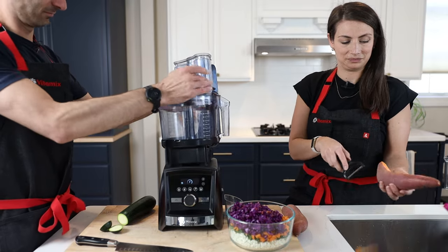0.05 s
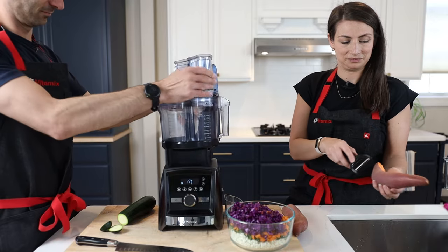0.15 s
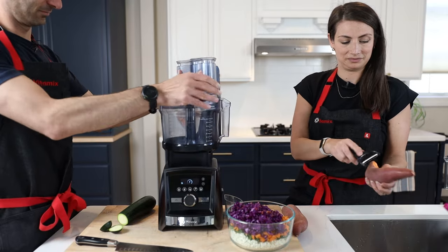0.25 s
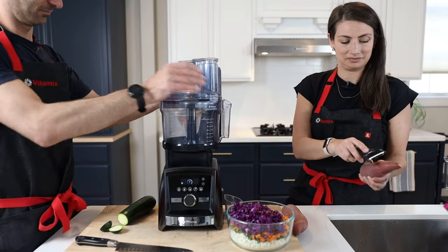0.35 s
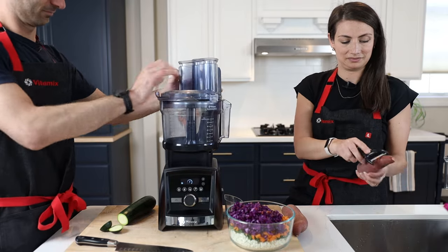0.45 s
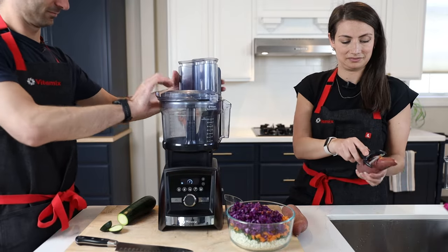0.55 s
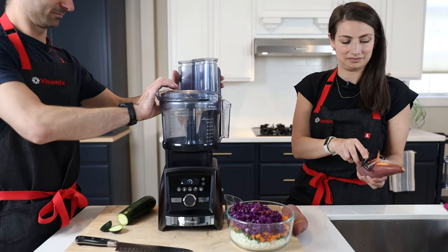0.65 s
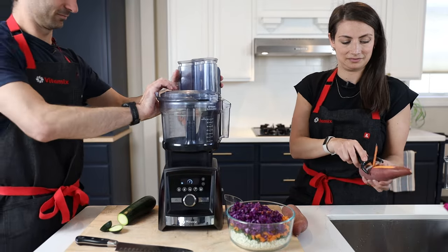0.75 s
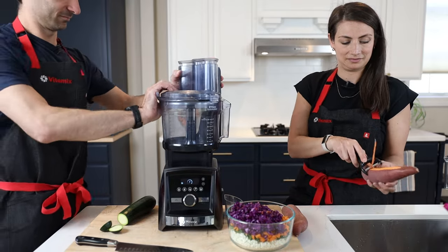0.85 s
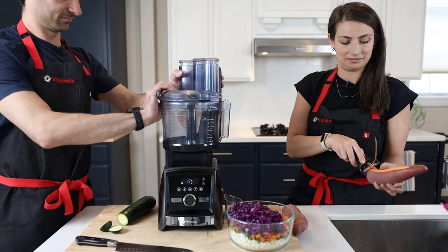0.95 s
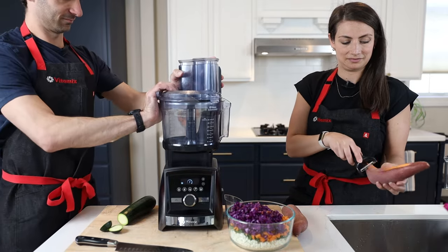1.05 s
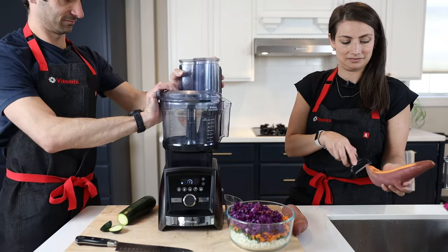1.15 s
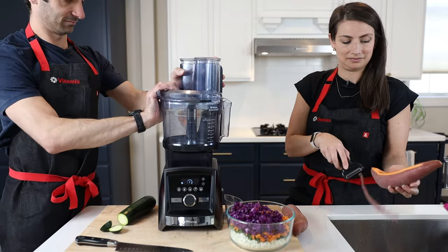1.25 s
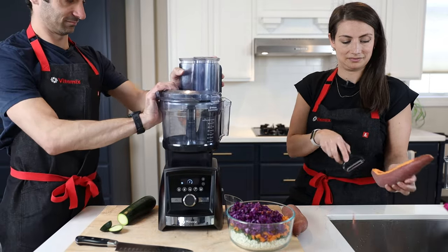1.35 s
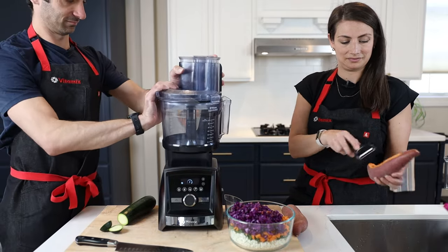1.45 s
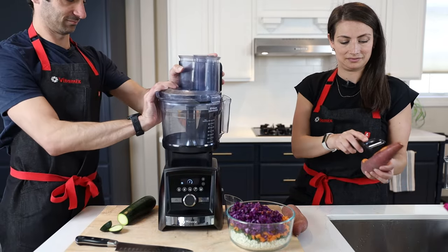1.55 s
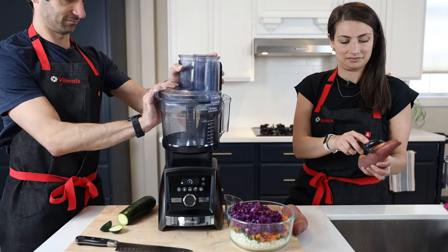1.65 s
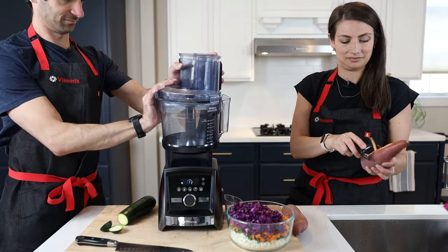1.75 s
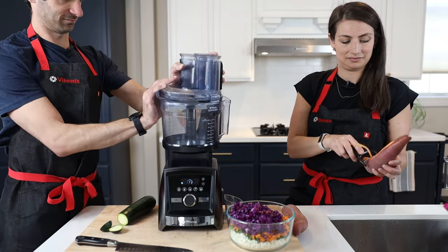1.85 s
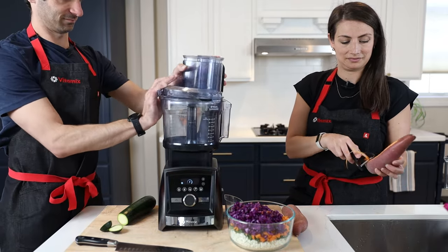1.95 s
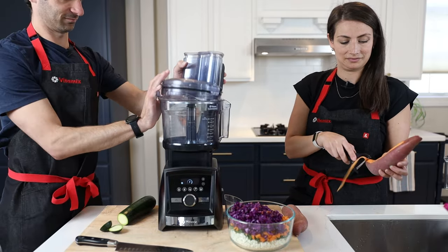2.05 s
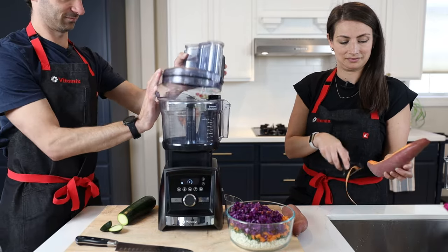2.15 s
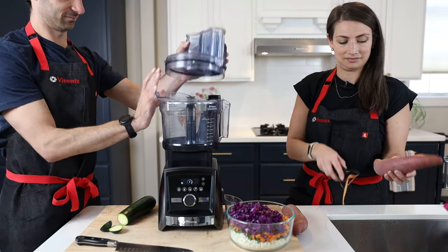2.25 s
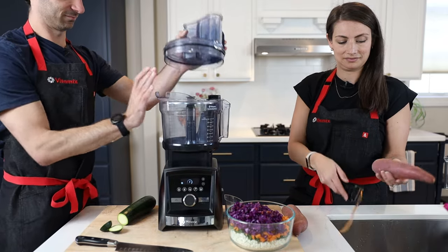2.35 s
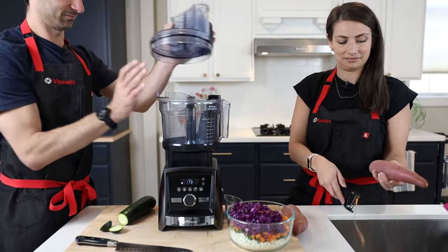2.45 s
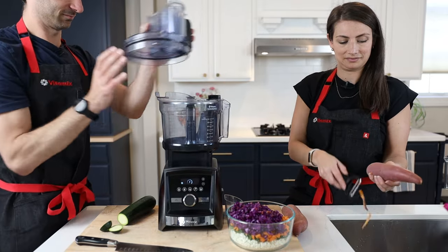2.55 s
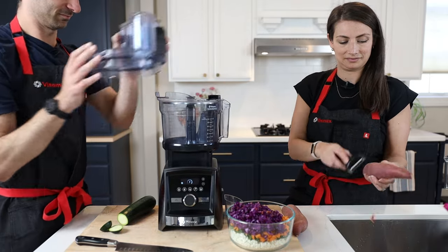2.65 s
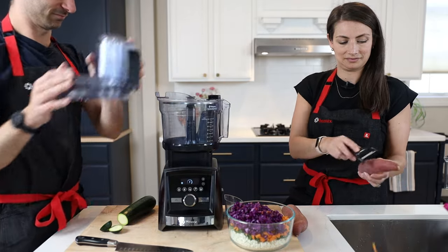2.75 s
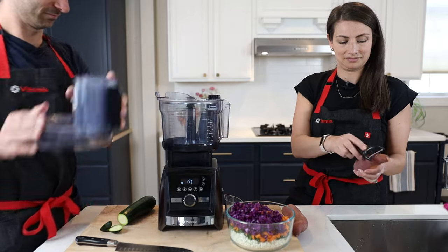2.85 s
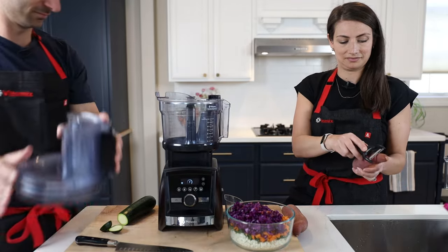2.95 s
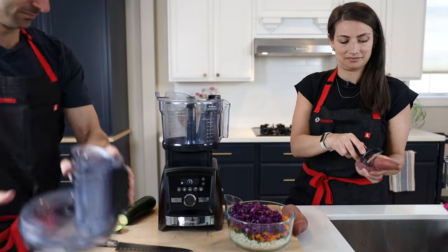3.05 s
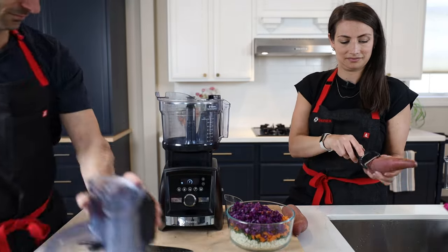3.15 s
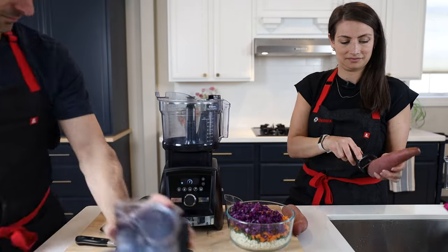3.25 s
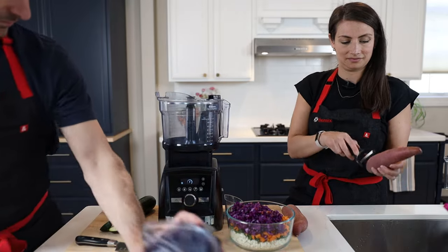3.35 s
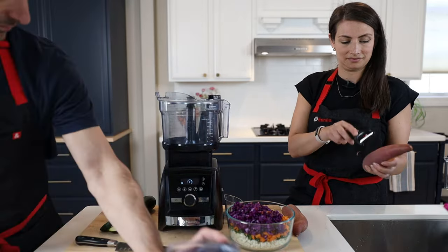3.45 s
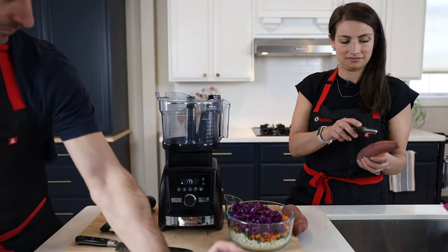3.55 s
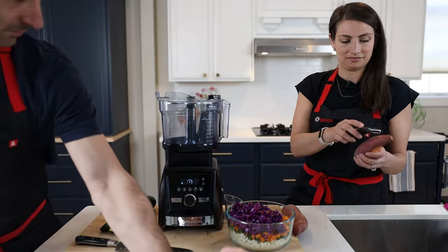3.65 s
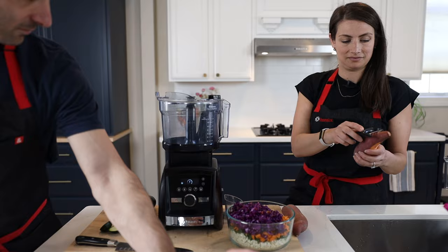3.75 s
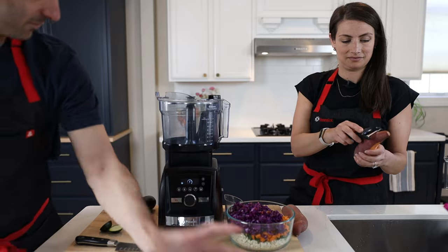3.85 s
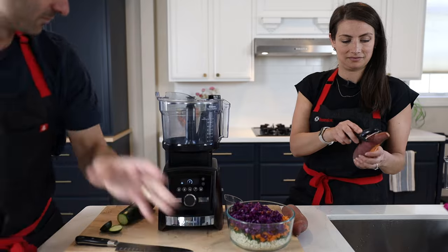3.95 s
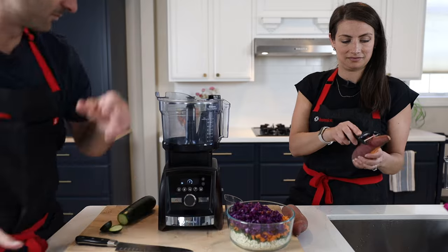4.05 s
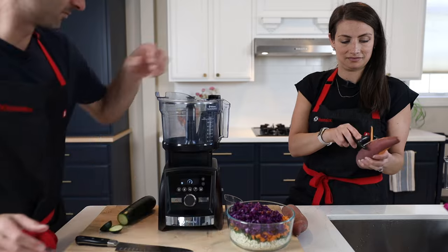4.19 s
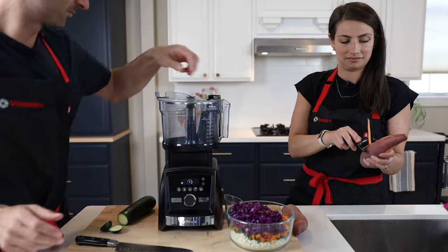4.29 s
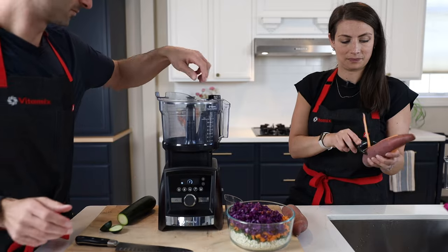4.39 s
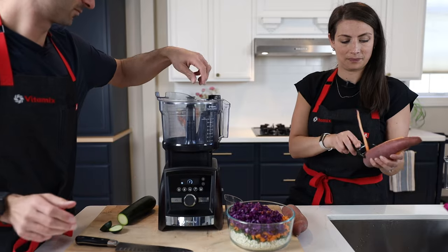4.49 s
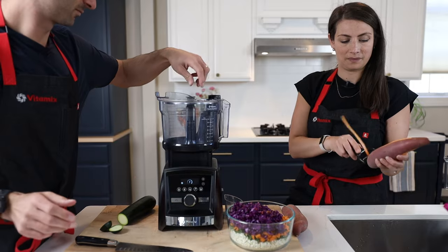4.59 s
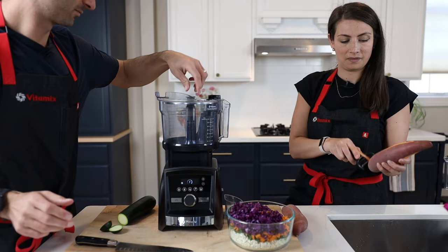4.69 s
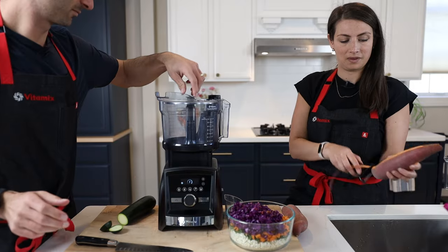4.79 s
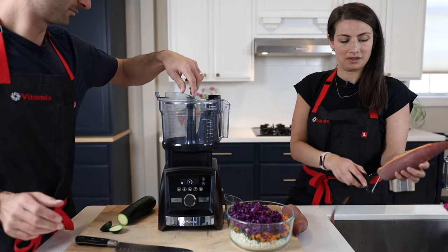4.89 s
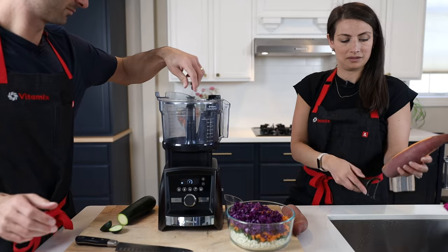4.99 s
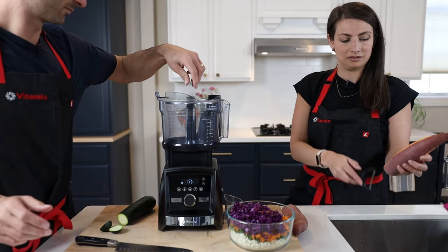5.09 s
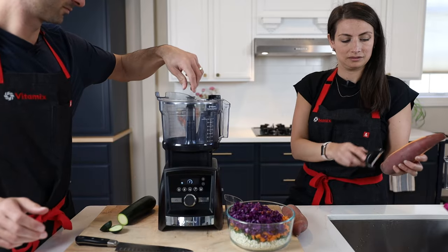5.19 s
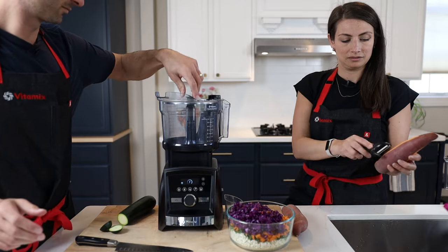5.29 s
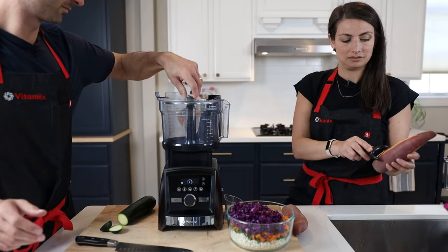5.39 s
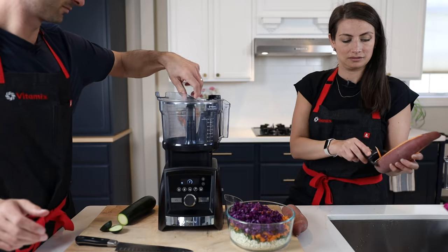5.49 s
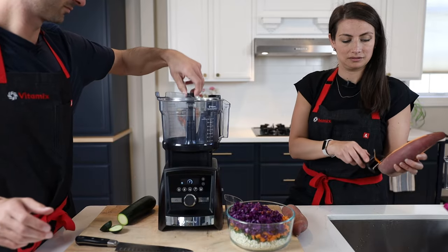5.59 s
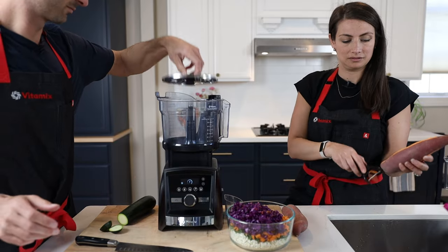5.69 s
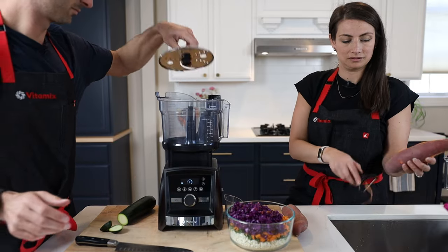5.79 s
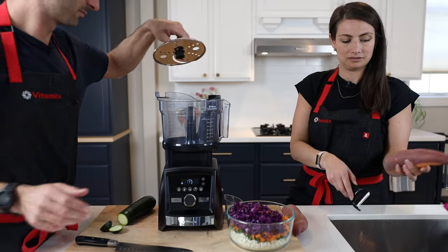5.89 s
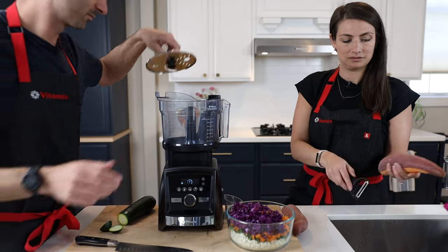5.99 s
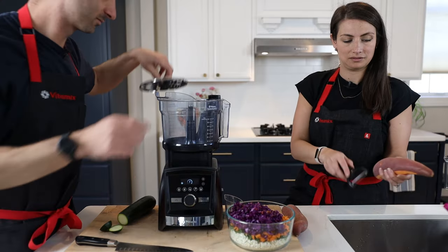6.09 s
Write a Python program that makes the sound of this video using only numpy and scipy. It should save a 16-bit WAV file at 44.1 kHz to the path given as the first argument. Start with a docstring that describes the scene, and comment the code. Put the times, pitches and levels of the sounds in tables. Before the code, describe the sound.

A plastic lid clacks, twists and unlatches with a sharp snap, then lands hollowly on a wooden board while a peeler scrapes crisp strokes nearby.

```python
"""In a kitchen, a food processor's plastic lid is twisted, unlatched, lifted off and set down on a wooden board,
then its slicing disc is drawn up the spindle. Nearer by, a swivel peeler takes long strokes along a sweet potato.
Knocks are shaped noise bursts with ringing modes; rubbing, scraping and peeling are grainy filtered noise.
The peeler's steel blade clicks as it bites and tinkles as it swings free. A faint hum fills the kitchen."""
import sys
import numpy as np
from scipy import signal
from scipy.fft import rfft, irfft, next_fast_len
from scipy.io import wavfile
from scipy.ndimage import map_coordinates

SR = 44100
rng = np.random.default_rng(int(sys.argv[2]) if len(sys.argv) > 2 else 0)


def int16_out(signal):
    """Quantize to a 16-bit WAV file."""
    q = np.round(np.clip(np.atleast_2d(signal).T, -1, 1) * 32767)
    wavfile.write(sys.argv[1], SR, q.astype(np.int16))


N = 270333  # length in samples

# spectrum of a plastic clack: [f/Hz, relative level/dB]
CLACK_SPECTRUM = [(150, -23), (400, -3.5), (800, 5), (1300, -2.5), (2100, -4), (2800, -11.5), (4500, -27.5),
                  (9000, -48.5)]
# spectrum of a hard-edged snap: [f/Hz, relative level/dB]
SNAP_SPECTRUM = [(600, -31), (1500, -8), (2200, 1.5), (2800, -3), (3600, 2), (4600, -6.5), (7000, -9.5),
                 (10500, -11.5), (16000, -23.5)]
# spectrum of plastic rubbing: [f/Hz, relative level/dB]
RUB_SPECTRUM = [(59, -31), (100, 1.5), (206, -7), (278, 0), (1440, -10), (2190, -20), (3990, -23.5),
                (6990, -34), (12000, -38.5), (15600, -75), (22000, -120)]
FIRM_DB = -41  # table level of a firm contact


def amp(db):
    """Decibels to gain."""
    return 10 ** (np.asarray(db) / 20)


def unit(x):
    """Scaled to rms 1."""
    return x / np.sqrt(np.mean(x ** 2) + 1e-20)


def along(points, hz):
    """(Hz, value) points read on a log frequency axis."""
    f, v = np.transpose(points)
    return np.interp(np.log(hz + 1), np.log(f + 1), v)


def decay(t, t60):
    """Exponential fade that loses 60 dB in t60 seconds."""
    return np.exp(-np.log(1000) * t / t60)


def wobble(rate):
    """A smooth random curve, rate knots a second."""
    knots = rng.standard_normal(int(N * rate / SR) + 4)
    return map_coordinates(knots, [np.arange(N) * rate / SR])


def filtered(x, response):
    """x times a response of frequency."""
    n = x.shape[-1]
    m = next_fast_len(n + 2048)  # padding keeps the filter's tail from wrapping onto the start
    return irfft(rfft(x, m) * response(np.fft.rfftfreq(m, 1 / SR)), m)[..., :n]


def coloured(x, spectrum):
    """x shaped by a spectrum, at rms 1."""
    return unit(filtered(x, lambda hz: amp(along(spectrum, hz))))


def add(track, s, sound):
    """Mixes a sound into the track at time s."""
    part = track[round(s * SR):][:len(sound)]
    part += sound[:len(part)]


def burst(spectrum, t60, attack, focus_hz=1000, focus_db=0, width=.16):
    """A knock as shaped noise, like many close modes dying fast; focus_db lifts those near focus_hz."""
    t = np.arange(SR // 2) / SR
    fade = decay(t, t60) * (1 - np.exp(-t / attack))

    def colour(hz):
        focus = np.exp(-(np.log((hz + 1) / focus_hz) / width) ** 2)
        return amp(along(spectrum, hz) + focus_db * focus)

    sound = fade * filtered(rng.standard_normal(len(t)), colour)
    return sound * np.linalg.norm(fade) / np.linalg.norm(sound)  # the energy of rms-1 noise under this fade


def ring(modes, attack, scatter_db):
    """Separate decaying modes (Hz, dB, t60), at new strengths for each blow."""
    t = np.arange(SR // 2) / SR
    tones = np.zeros(len(t))
    for hz, db, t60 in modes:
        strength = amp(db + scatter_db * rng.normal())
        tones += strength * decay(t, t60) * np.sin(2 * np.pi * hz * t)
    return tones * (1 - np.exp(-(t / attack) ** 2))


def friction(grain_db, grain_rate):
    """Noise that catches and slips in tiny uneven grains."""
    return rng.standard_normal(N) * amp(grain_db * wobble(grain_rate))


def swell(peak_s, db, rise, fall):
    """Gain of one rubbing movement: it gathers to a peak and eases off, evenly in dB."""
    t = np.arange(N) / SR - peak_s
    return amp(db - 19.5 * np.maximum(-t / rise, t / fall))  # 19.5 dB over each rise or fall time


def drifting(x, depth_db, band_hz, life):
    """The colour of x wanders in patches band_hz wide that last about life seconds."""
    hz, t, z = signal.stft(x, SR, nperseg=512)
    knots = rng.standard_normal(size=(128, 128))
    grid = np.meshgrid(hz / band_hz, t / life, indexing="ij")
    field = map_coordinates(knots, grid, mode="mirror")
    return signal.istft(z * amp(depth_db * field), SR)[1][:N]


def placed(x, left_db):
    """A mono sound leaning left by left_db."""
    return x * amp([[left_db / 2], [-left_db / 2]])


def lid_clacks():
    """Each contact clacks the bowl, thumps the base and rebounds; the latch's hard edges add a snap."""
    # lid and disc knock the bowl: [t/s, clack level/dB, snap level/dB (both before trim),
    # room level re direct/dB, favoured f/Hz]
    clacks = [(0.104, -39.5, -39, -6.5, 2280), (0.150, -58, -72, -10, 1500), (0.326, -55, -75, -3, 1500),
              (0.343, -36.5, -52.5, -11, 960), (0.412, -49.5, -72, -8, 760), (0.958, -51.5, -64, -1, 1100),
              (1.329, -38, -68, -11.5, 1200), (1.335, -39.5, -76, -12.5, 740),
              (1.7983, -38.5, -21.5, -5.5, 2030), (1.8046, -35.5, -28, -14, 3500),
              (1.850, -42, -38.5, -4, 980), (1.855, -38.5, -58, -10, 780), (1.962, -43, -51, -6, 653),
              (1.980, -35, -37.5, -9.5, 1260), (2.068, -45.5, -58.5, -13, 1400),
              (2.103, -45.5, -54, -9.5, 970), (5.094, -59, -70, 1.5, 954), (5.128, -60.5, -74, -3, 808)]
    # the base's thump: [f/Hz, relative level/dB]
    thump_spectrum = [(30, -27), (70, -2), (125, -2.5), (190, -4), (300, -5.5), (450, -12), (900, -32),
                      (3000, -84)]
    out = np.zeros(N)
    for s, clack_db, snap_db, room_db, hz in clacks:
        clack = burst(CLACK_SPECTRUM, t60=0.043, attack=0.00038, focus_hz=hz, focus_db=8.0)
        clack = amp(clack_db + 1.5) * clack
        snap = amp(snap_db + 0.5) * burst(SNAP_SPECTRUM, t60=0.025, attack=.0002, focus_hz=hz, focus_db=2.0)
        thump_db = -50 + 0.64 * (clack_db - FIRM_DB)  # grows 0.64 dB per dB of clack
        thump = amp(thump_db) * burst(thump_spectrum, t60=0.15, attack=0.0015)
        # the fall back is softer and lower
        rebound = burst(CLACK_SPECTRUM, t60=0.028, attack=0.00036, focus_hz=0.61 * hz, focus_db=9)
        add(out, s, clack + snap + thump)
        add(out, s + .007, amp(clack_db - 4.5) * rebound)
        add(out, s, amp(room_db) * kitchen(clack + snap + amp(-4.5) * thump))
    return out


def lid_landing():
    """The hollow lid meets the board edge first, rocks and settles with a thud; it rings longer once let go."""
    # the rim lands on the board: [t/s, blow level/dB before trim, tick level/dB, thud level/dB]
    landings = [(3.5872, -17, -31.5, -56.5), (3.5893, -3, -44, -42), (3.6215, -16.5, -40, -52),
                (3.633, -17.5, -56.5, -51), (3.710, -20, -46.5, -31), (3.728, -22, -59, -40.5),
                (3.748, -24.5, -61, -46.5)]
    # modes of the lid: [f/Hz, relative level/dB, t60/s when free of the hand]
    lid_modes = [(439, -30, .25), (506, -20.5, 0.33), (569, -7, 0.063), (597.3, -21, .35),
                 (655.7, 7, 0.059), (706, -14, .45), (797, -27.5, 0.394), (876, -16, .15),
                 (1128, -17, 0.0789), (1290, -10.5, 0.058), (1382, -25.5, .28), (1567, -25, 0.054),
                 (2000, -36.5, 0.13)]
    # the board's thud: [f/Hz, relative level/dB]
    board_spectrum = [(40, -29.5), (90, -6), (140, 1), (260, 0), (390, -4.5), (600, -9), (1200, -14.5),
                      (3000, -48)]
    gripped, let_go_s = 0.62, .16  # share of its ring time that the hand leaves the lid; time to let go
    out = np.zeros(N)
    bass_cut = signal.butter(2, 330, "high", fs=SR, output="sos")  # an open shell radiates little bass
    for s, blow_db, tick_db, thud_db in landings:
        free = np.interp(s - landings[0][0], [0, let_go_s], [gripped, 1])
        modes = [(hz, db, t60 * free) for hz, db, t60 in lid_modes]
        body = amp(blow_db - 2.5) * signal.sosfilt(bass_cut, ring(modes, attack=0.0021, scatter_db=2.0))
        shell = burst(CLACK_SPECTRUM, t60=.04, attack=0.0016, focus_hz=1390, focus_db=10.5)
        shell = amp(blow_db - 14.5) * shell
        tick = amp(tick_db) * burst(SNAP_SPECTRUM, t60=0.0092, attack=.0002, focus_hz=4750, focus_db=12)
        thud = amp(thud_db) * burst(board_spectrum, t60=0.16, attack=0.003)
        add(out, s, body + shell + tick + thud)
        to_room = amp(-12.5) * body + amp(-7.5) * shell + amp(-9.0) * tick + amp(-12.5) * thud
        add(out, s, kitchen(to_room, delay=.012))
    return out


def disc():
    """The disc's hollow hub scrapes up the spindle, its resonances filtering the friction, and catches once."""
    # hub resonances: [f/Hz, width/Hz, relative level/dB]
    resonances = [(397, 38, 1.5), (1070, 200, -7), (1270, 220, -4.5), (1826, 310, -10.5)]
    lift_s = 5.70  # the scrape is strongest and catches here

    def hub(f):
        response = 0
        for k, (centre, width, db) in enumerate(resonances):
            loss = 1j * f * width
            response = response + (-1) ** k * amp(db) * loss / (centre * centre - f * f + loss)
        return response / (1 + (f / 2400) ** 4)  # the treble is rolled off

    scrape = unit(filtered(friction(grain_db=2.4, grain_rate=300), hub))
    out = swell(lift_s, db=-45, rise=.078, fall=.044) * scrape
    catch = burst(CLACK_SPECTRUM, t60=.025, attack=.0004, focus_hz=1250, focus_db=14)
    add(out, lift_s, amp(-41.5) * catch)
    return out + amp(-11.5) * kitchen(out)


def peeler():
    """Strokes, dry double clicks as the blade bites, and taps of the pivot that ring the steel."""
    # the blade touches the skin, then swivels flat and bites:
    # [bite t/s, level/dB, time since the touch/s, brightness/dB]
    bites = [(0.5561, -34.5, 0.0031, 3), (1.6485, -54, 0.0011, -1), (1.7377, -33.5, 0.0077, 0),
             (2.1787, -44.5, .001, 2), (2.9896, -43.5, .012, 0), (3.136, -55.5, 0.0011, 8),
             (3.849, -32.5, .0028, 6), (4.165, -53.5, 0.00098, 0.5), (5.4424, -32, 0.0076, -1.5)]
    # the free blade taps its pivot: [t/s, level/dB, centre f/Hz]
    swings = [(0.537, -52, 9000), (1.275, -45.5, 5000), (1.3708, -50.5, 4100), (2.2107, -48, 4100),
              (2.3712, -51.5, 5000), (2.454, -52.5, 4100), (2.475, -54.5, 4100), (2.5787, -56.5, 4000),
              (2.84, -59, 4750), (3.4327, -50.5, 5000), (4.8936, -50.5, 4700), (4.899, -49.5, 4790),
              (5.128, -56, 4000), (5.1958, -57, 4000), (5.2175, -49.5, 2240), (5.2796, -54.5, 3160),
              (5.289, -53.5, 4350), (5.7682, -47, 3500), (6.0794, -58, 3206)]
    # click of the bite: [f/Hz, relative level/dB]
    bite_spectrum = [(300, -31), (700, -2.5), (1500, -6), (2800, -2), (4200, -7.5), (5600, 4),
                     (7500, -12.5), (9200, -3), (11000, -5), (12800, -1), (14500, -9), (16000, -7)]
    # tap of the pivot: [f/Hz, relative level/dB]
    pivot_spectrum = [(700, -23.5), (2000, -3.5), (3200, 0), (5500, -4), (7500, -11.5), (12000, -7.5),
                      (16000, -14.5)]
    # modes of the steel blade: [f/Hz, relative level/dB, t60/s]
    blade_modes = [(4063, 0.5, 0.15), (4800, -2, 0.13), (5350, -6, 0.13), (8300, -5, 0.13),
                   (10600, -12, .12), (11390, -5, .14), (13020, -8, .3), (15350, -21, .1)]
    out = peeling()
    for s, db, lead, bright_db in bites:
        touch = burst(bite_spectrum, t60=0.022, attack=0.00025)
        bite = burst(bite_spectrum, t60=0.024, attack=0.0003, focus_hz=12500, focus_db=bright_db, width=.25)
        add(out, s - lead, amp(db - 6) * touch)
        add(out, s, amp(db) * bite)
    # 18 faint stray ticks of the loose pivot, at random times
    rattles = [(when * N / SR, -70 + 6 * size, 3400) for when, size in rng.random((18, 2))]
    for s, db, hz in swings + rattles:
        ring_db = db - 18 + 11.5 * np.log2(hz / 4446)  # brighter taps ring more, 11.5 dB an octave
        tap = burst(pivot_spectrum, t60=0.023, attack=0.00018, focus_hz=hz, focus_db=9.5, width=.24)
        add(out, s, amp(db) * tap)
        add(out, s, amp(ring_db) * ring(blade_modes, attack=.0003, scatter_db=3.5))
    return out + amp(-16.0) * kitchen(out)


def peeling():
    """The blade crunches through fine cells, loudest and brightest where the cut is deepest; the colour drifts."""
    # strokes: [start t/s, length/s, share of the length at which the cut is deepest,
    # level there/dB, swell/dB, brightness/dB]
    strokes = [(0.558, .73, .45, -58, 5, -1.7), (1.742, .435, .4, -58, 5, -3),
               (3.062, .33, .62, -65.5, 4.5, 2.6), (4.075, .81, .43, -56.5, 9, 2),
               (5.443, .31, .5, -60.5, 4, -1.4)]
    # crunch of the skin: [f/Hz, relative level/dB]
    peel_spectrum = [(300, -14.5), (700, -4), (1500, -8.5), (2200, -4), (2850, 1.5), (3600, -9.5),
                     (4900, -10), (5900, -5), (7700, -18), (9000, -9.5), (10800, -11.5), (12200, -2),
                     (13500, -8), (16000, -14.5)]
    attack_s, release_s = 0.0077, .011  # the blade enters and leaves the skin
    cells = drifting(friction(grain_db=2.2, grain_rate=900), depth_db=2.5, band_hz=380, life=.12)
    crunch = coloured(cells, peel_spectrum)
    hiss = filtered(crunch, lambda hz: 1 - 1 / (1 + (hz / 8000) ** 6))  # the part above about 8 kHz
    t, out = np.arange(N) / SR, np.zeros(N)
    for start, length, deepest, db, swell_db, bright_db in strokes:
        age = t - start
        shallowness = np.interp(age / length, [0, min(deepest, 1), 1], [1, 0, 1])
        depth_db = -swell_db * shallowness ** 1.5
        entry = np.minimum(age, 0) / attack_s
        leaving = np.maximum(age - length, 0) / release_s
        contact = np.exp(entry - leaving)
        # the hiss follows the depth more steeply than the crunch
        cut = amp(depth_db) * (crunch - hiss) + amp(bright_db + 1.3 * depth_db) * hiss
        out += contact * amp(db) * cut
    return out * amp(.6 * wobble(11))


def bumps():
    """Padded contacts wake one low mode, with a dull scuff; a firmer hand damps the ring sooner."""
    # hands, lid and disc bump the machine's body: [t/s, level/dB, f/Hz]
    contacts = [(0.085, -49, 112.3), (0.345, -35.5, 99), (1.332, -42.5, 119), (1.559, -56, 124),
                (1.65, -57.5, 507), (1.922, -42.5, 183), (1.984, -40, 164), (2.008, -45, 161),
                (2.11, -47, 243.4), (2.97, -60.5, 127), (5.087, -55.5, 503), (5.123, -49, 126),
                (5.195, -59, 135), (5.590, -52.5, 405)]
    out = np.zeros(N)
    for s, db, hz in contacts:
        t60 = 0.13 * 2 ** ((FIRM_DB - db) / 12)  # doubles for a touch 12 dB lighter
        add(out, s, amp(db) * ring([(hz, 0, t60)], attack=0.0026, scatter_db=2.5))
        add(out, s, amp(db - 12.5) * burst(RUB_SPECTRUM, t60=0.19, attack=0.0036))
    return out


def handling():
    """The turning lid's rim rubs round the bowl, and cloth brushes with the reaching arm: swelling friction."""
    # the hand turns the lid: [strongest t/s, level/dB, rise/s, fall/s]
    turns = [(0.0, -57, .05, .13), (0.17, -61, 0.31, 0.55), (0.43, -61.5, .3, .5), (0.7, -66, .3, 1.0),
             (0.99, -58, .13, .85), (1.27, -60.5, .5, 0.3), (1.93, -59, .4, .5), (2.11, -57.5, .4, 0.42),
             (2.44, -63.5, 0.39, 0.16)]
    # a sleeve and apron brush as the arm reaches: [strongest t/s, level/dB, rise/s, fall/s]
    reaches = [(2.91, -70.5, 0.14, 0.48), (3.39, -55, 0.27, 0.52), (4.78, -64.5, 0.91, .3)]
    # brushing cloth: [f/Hz, relative level/dB]
    cloth_spectrum = [(88, -51), (150, -23.5), (257, -3.5), (589, -6), (1160, -9.5), (1380, -5.5),
                      (1490, -10.5), (2020, -10.5), (15000, -33.5)]
    turning = np.max([swell(*turn) for turn in turns], axis=0)
    reaching = np.max([swell(*reach) for reach in reaches], axis=0)
    rim = turning * coloured(friction(grain_db=3.5, grain_rate=70), RUB_SPECTRUM)
    cloth = reaching * coloured(friction(grain_db=1.5, grain_rate=57), cloth_spectrum)
    return rim + cloth


def whistle():
    """A thin, faint sine, wavering in pitch, fades in and out and mostly falls as the lid is set down."""
    # its path: [t/s, f/Hz, level/dB]
    glide = [(3.50, 15400, -81.5), (3.535, 14700, -78), (3.59, 15700, -78.5), (3.67, 13600, -73),
             (3.735, 12100, -81), (3.78, 12400, -74.5), (3.83, 11300, -82)]
    s, hz, db = np.transpose(glide)
    t = np.arange(N) / SR
    pitch = np.interp(t, s, hz) * (1 + .003 * wobble(300))
    gain = amp(np.interp(t, s, db, left=-np.inf, right=-np.inf))  # silent outside its path
    return gain * np.sin(2 * np.pi * np.cumsum(pitch) / SR)


def kitchen(x, delay=.006, build=0.0049):
    """The diffuse answer of cupboards and tiles: noise that builds up after the direct sound, then decays."""
    # reverberation: [f/Hz, t60/s]
    reverb_times = [(100, 0.75), (700, 0.52), (3000, 0.47), (7000, 0.34), (15000, 0.3)]
    hz, t, z = signal.stft(rng.standard_normal(SR // 2), SR, nperseg=256)
    z = z * decay(t, along(reverb_times, hz)[:, None]) * (1 - np.exp(-t / build))
    tail = np.pad(signal.istft(z, SR)[1], (round(delay * SR), 0))
    return signal.fftconvolve(x, tail / np.linalg.norm(tail))[:N]


def room_tone():
    """Still air as coloured noise, and the slightly unsteady hum of appliances as wavering sines."""
    # hum partials: [f/Hz, mean rms level/dB]
    hum_partials = [(54, -71.5), (113, -82.5), (263.5, -76.5)]
    # still air: [f/Hz, relative level/dB]
    air_spectrum = [(12, -32.5), (20, -2.5), (77, -12.5), (177, -23), (277, -17), (337, -25.5),
                    (446, -17.5), (1150, -27), (1570, -26), (1960, -29.5), (6180, -37), (13500, -41),
                    (16000, -47)]
    t = np.arange(N) / SR
    hum = np.zeros(N)
    for hz, db in hum_partials:
        level = amp(db + 1.5 * wobble(4)) * np.sqrt(2)
        hum += level * np.sin(2 * np.pi * hz * t + 0.3 * wobble(3.7))
    return hum + amp(-69) * coloured(rng.standard_normal(N), air_spectrum)


def scene():
    """The machine and room tone lean a little left, the lid's landing more; the peeler is near the middle."""
    machine = lid_clacks() + bumps() + handling() + disc() + room_tone()
    set_down = lid_landing() + whistle()
    return placed(machine, left_db=0.73) + placed(set_down, left_db=1.1) + placed(peeler(), left_db=0.25)


def record(dry):
    """Nothing is kept from 15.9 kHz up."""
    return filtered(dry, lambda hz: hz < 15900)


dry = scene()
out = record(dry)
int16_out(out)
```